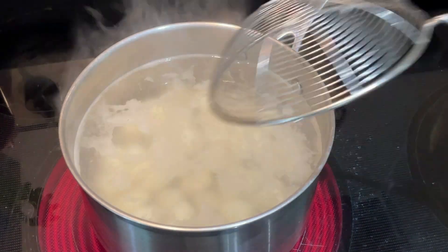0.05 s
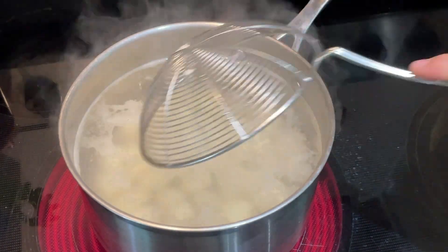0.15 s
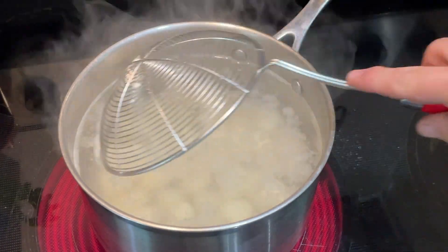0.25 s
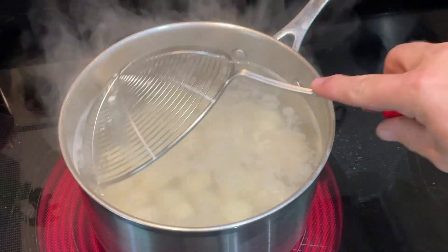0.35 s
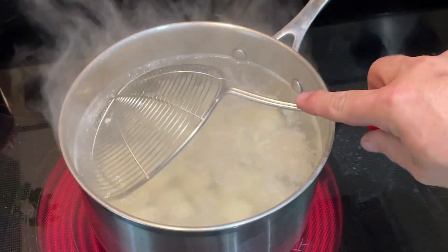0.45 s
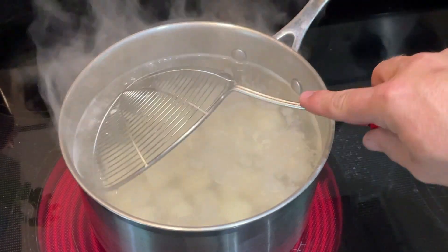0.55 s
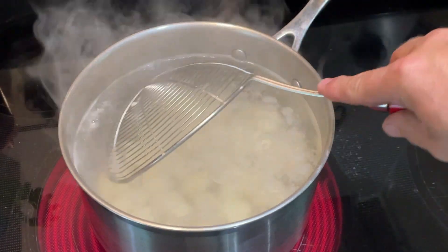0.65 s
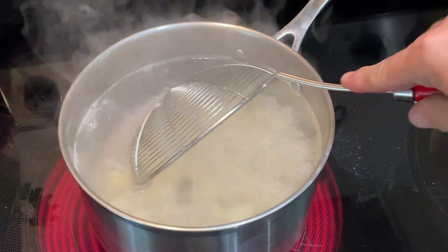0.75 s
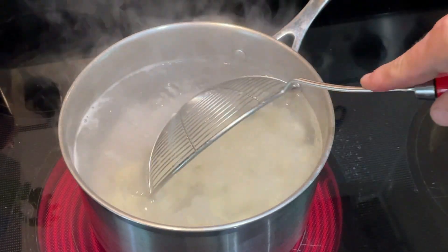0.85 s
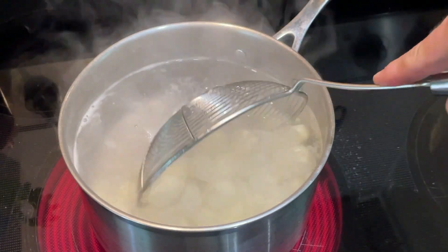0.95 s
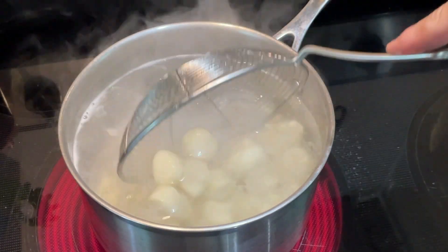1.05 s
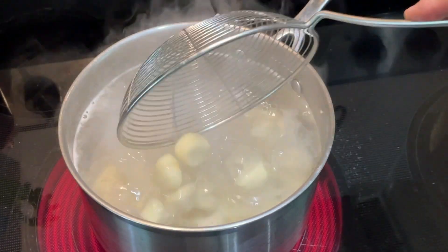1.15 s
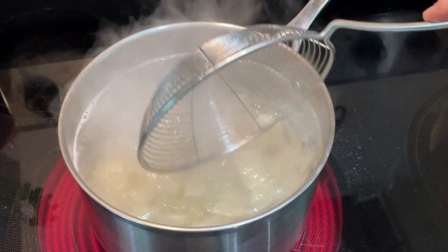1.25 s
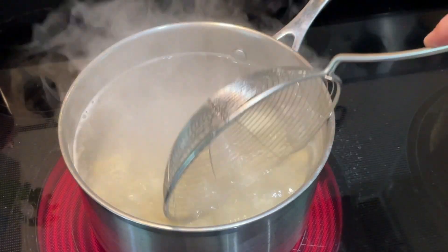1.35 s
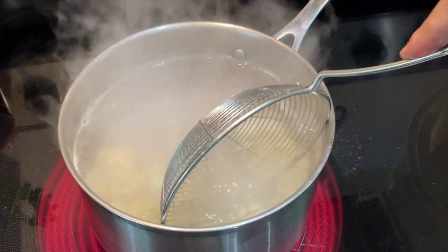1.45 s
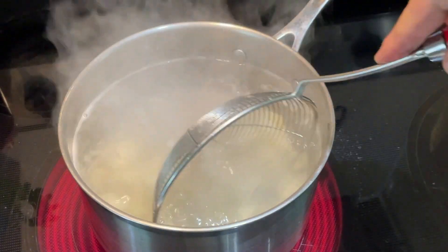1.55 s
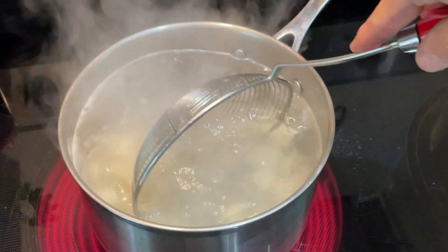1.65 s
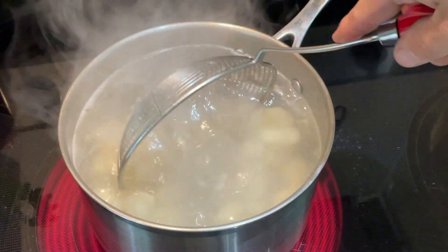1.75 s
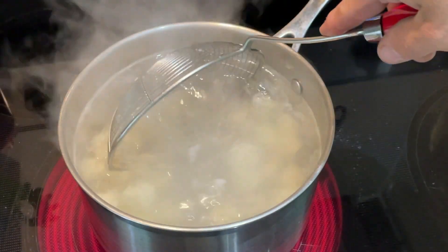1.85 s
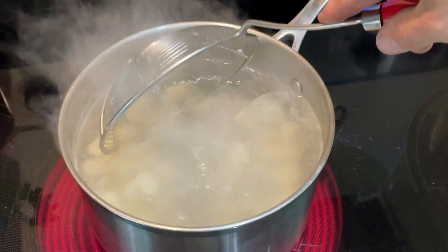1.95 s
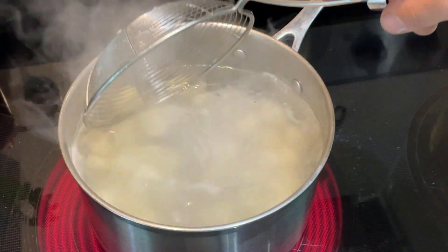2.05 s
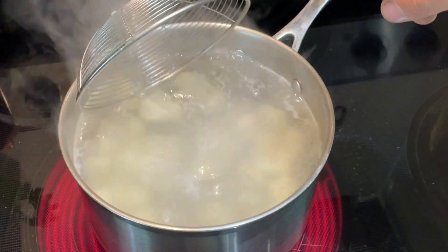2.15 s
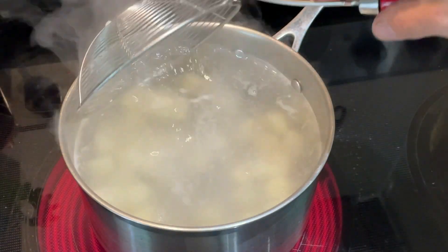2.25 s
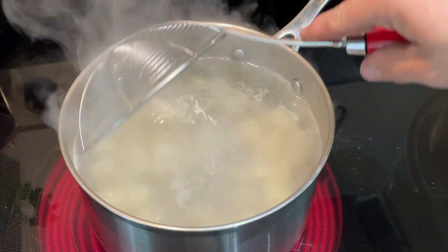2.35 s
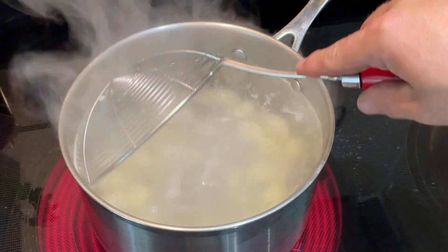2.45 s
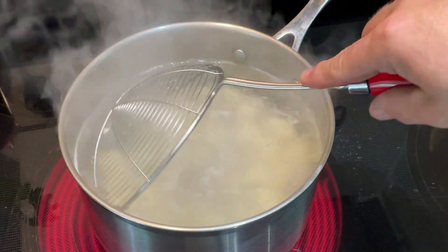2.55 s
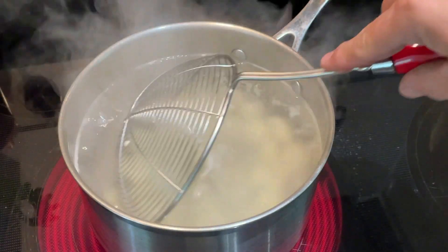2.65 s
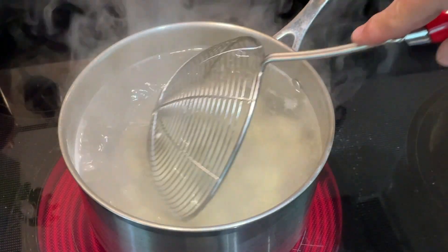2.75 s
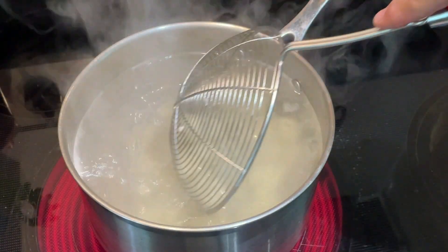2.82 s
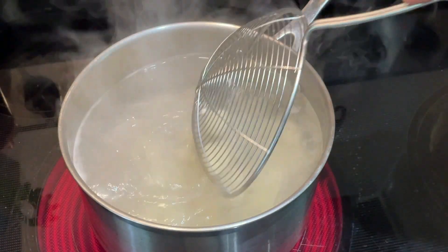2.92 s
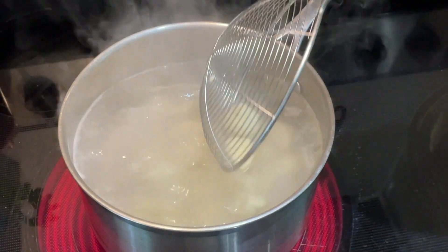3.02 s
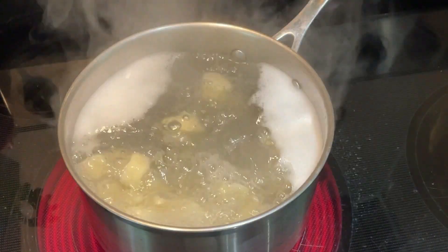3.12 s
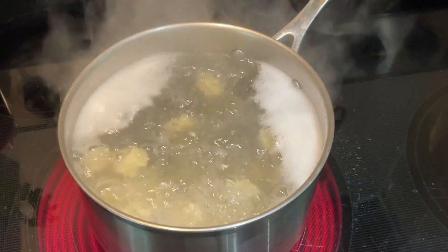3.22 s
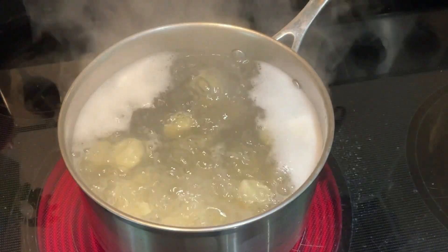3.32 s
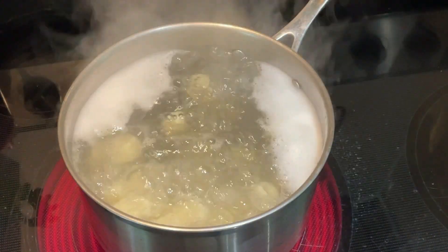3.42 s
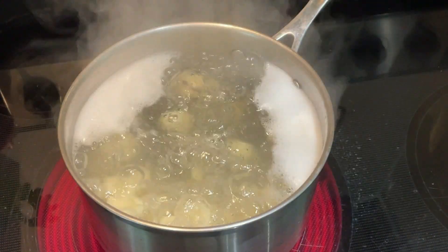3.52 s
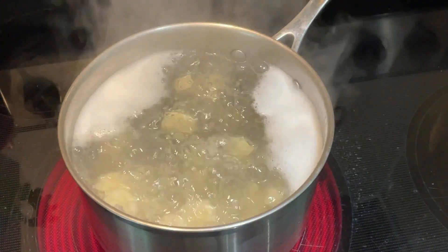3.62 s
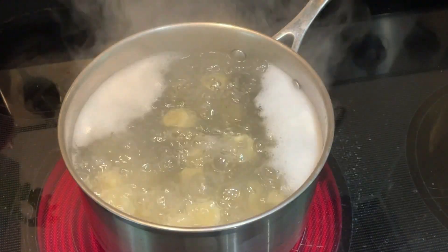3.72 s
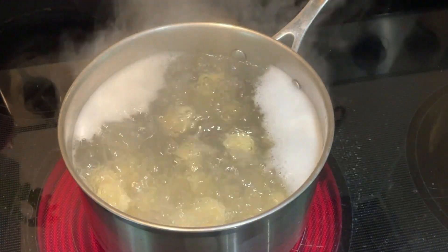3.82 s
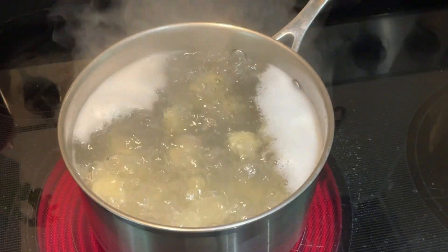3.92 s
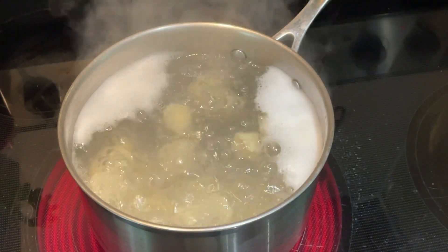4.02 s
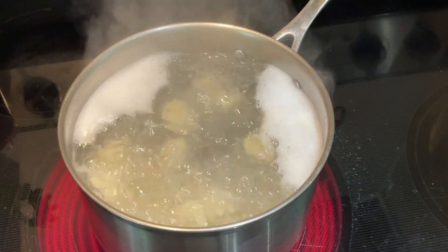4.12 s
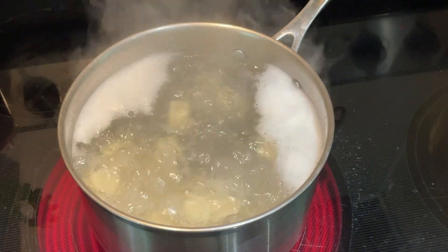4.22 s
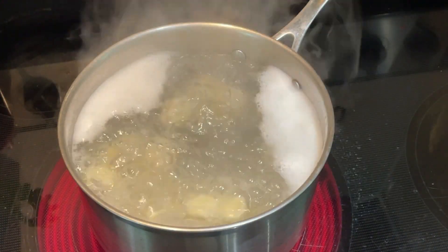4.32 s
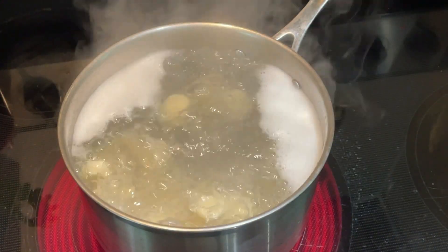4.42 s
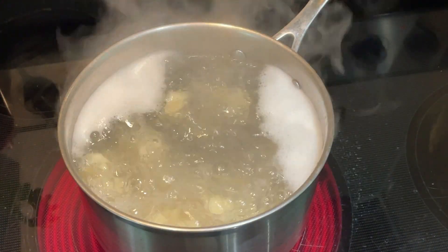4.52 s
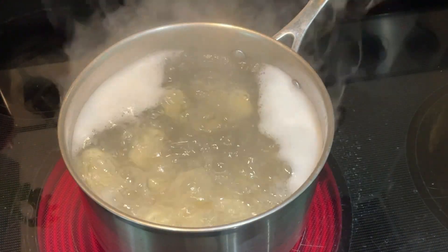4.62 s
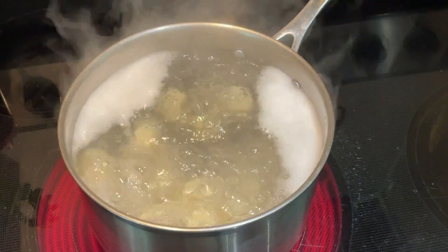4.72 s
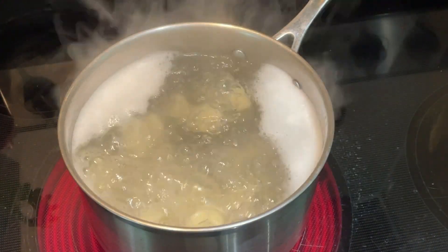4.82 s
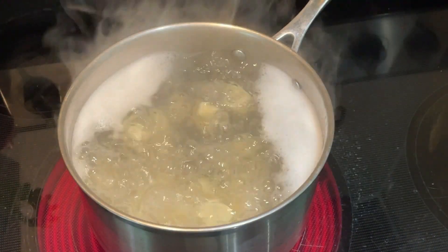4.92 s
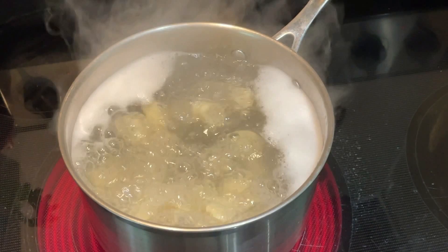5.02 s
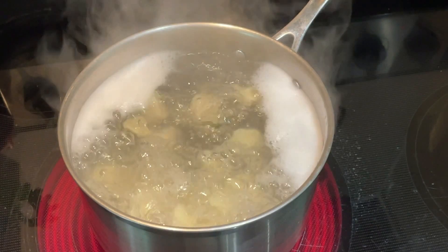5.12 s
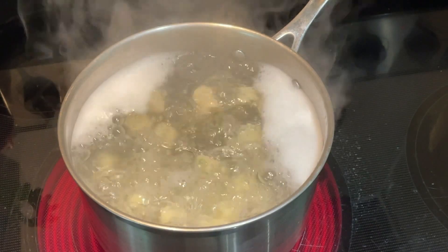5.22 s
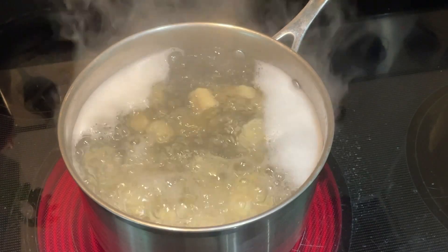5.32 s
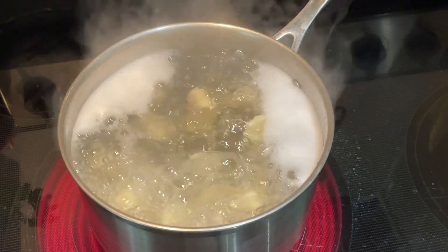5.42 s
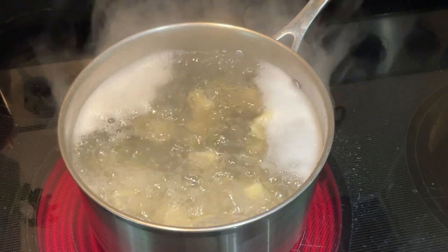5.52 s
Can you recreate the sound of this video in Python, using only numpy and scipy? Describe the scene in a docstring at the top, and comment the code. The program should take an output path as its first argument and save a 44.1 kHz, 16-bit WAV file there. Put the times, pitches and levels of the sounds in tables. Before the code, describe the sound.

Water boils in a metal pan, a wire strainer clanks sharply a few times, then a sudden cut to livelier popping, gurgling bubbles.

```python
"""Dumplings boil hard in a steel saucepan on a glass hob in a home kitchen.
The pan rumbles, the water gurgles and froth hisses: drifting noise, and small bubbles that ring briefly.
A wire skimmer knocks and scrapes: blows and grit set the pan, wires, hob and counter ringing.
A drip and bursting bubbles sound as short rising notes.
The scene cuts at 3.13 s to a more hissing, bubbling boil."""
import sys
import numpy as np
from scipy import signal
from scipy.fft import rfft, irfft, next_fast_len
from scipy.io import wavfile

SR = 44100
rng = np.random.default_rng(int(sys.argv[2]) if len(sys.argv) > 2 else 0)


def pcm_store(signal):
    """Save signal as 16-bit PCM."""
    levels = np.round(np.clip(np.atleast_2d(signal), -1, 1) * 32767)
    wavfile.write(sys.argv[1], SR, levels.astype(np.int16).T)


N = 245892   # length in samples

# vigour of the boil, before and after the cut: t/s, gurgle level/dB, hiss level/dB
BOIL_VIGOUR = [(0, -39, -55), (.15, -46.5, -47), (1.0, -46, -48), (2.3, -44.5, -53), (2.65, -40.5, -49.5),
               (3.1, -48.5, -54), (3.13, -47.5, -44.5), (3.5, -42.5, -47.5), (5.58, -47, -47)]
# bubbles bursting, and first a drip: t/s, level/dB, basic f/Hz
BUBBLES_AND_DRIP = [(1.291, -38, 1550), (3.395, -35.5, 930), (3.463, -22.5, 517), (3.631, -26.5, 495),
                    (3.813, -22.5, 442), (3.964, -33, 577), (4.236, -25, 510), (4.282, -30.5, 650),
                    (4.321, -30, 603), (4.3299, -32.5, 1430), (4.345, -25.5, 425), (4.4783, -40.5, 1540),
                    (4.702, -30, 510), (4.768, -28, 560), (4.898, -25, 527), (4.907, -40, 1530),
                    (4.957, -27, 620), (4.9763, -33, 1360), (5.078, -23, 440), (5.24, -29, 420),
                    (5.2528, -33.5, 1460), (5.372, -41, 634), (5.524, -25, 600)]
# skimmer knocks: t/s, crack level/dB, thump level/dB, pan ring level/dB, favoured pan f/Hz,
# wire ring level/dB, favoured wire f/Hz
SKIMMER_KNOCKS = [(0.343, -38.5, -39, -55, 800, -55, 5000), (0.3911, -12, -11.5, -15, 1180, -17, 3080),
                  (.522, -10.5, -15, -15.5, 610, -34, 3300), (0.6472, -28.5, -21, -21.5, 800, -25, 3470),
                  (1.4474, -13.5, -35, -21, 990, -11, 3400), (1.4678, -5.5, -10, -16.5, 900, -21, 5430),
                  (1.4841, -41, -14.5, -29, 1410, -15.5, 2610), (1.5175, -20, -24.5, -19, 920, -22, 6600),
                  (2.357, -31, -26, -34, 695, -35, 3370), (2.4157, -37, -26.5, -40, 790, -28.5, 2750),
                  (2.626, -65, -30, -33.5, 780, -40, 1990)]
# skimmer dragged along the wall: start t/s, length t/s, pan rub level/dB, wire rub level/dB
SKIMMER_DRAGS = [(0.617, 0.14, -61, -58), (0.777, 0.099, -72, -52.5), (2.354, 0.1, -72, -71),
                 (2.624, .14, -71, -85)]
# ways the glass hob rings: f/Hz, relative level/dB, time to fall 60 dB t/s
HOB_MODES = [(163.9, 2, 0.35), (181.7, -10, 0.22), (221.4, -3, 0.051), (247, -14, 0.33), (320.8, 2, 0.2)]
# ways the counter rings: f/Hz, relative level/dB, time to fall 60 dB t/s
COUNTER_MODES = [(60.85, -2, 0.49), (83, 8.5, 0.22), (111, 3, 0.6)]
# ways the pan rings, each the middle of a close pair: f/Hz, relative level/dB, time to fall 60 dB t/s
PAN_MODES = [(425, -1.5, 0.11), (512, -3.5, 0.038), (588, -0.5, 0.11), (821, -5, 0.082),
             (1008, -2.5, 0.042), (1158, -11.5, 0.083), (1452, -10.5, 0.091), (1474, -3.5, 0.086)]
# ways the wire basket rings, each the middle of a close pair: f/Hz, relative level/dB
WIRE_MODES = [(1700, -6.5), (2020, -6.5), (2480, -11), (2660, -10.5), (2860, -4.5), (3380, -4.5),
              (3600, -16), (3950, -7.5), (4460, -5.5), (5300, -4.5), (6400, -4)]
# colour of the pan's rumble: f/Hz, relative level/dB
RUMBLE_COLOUR = [(25, -31), (40, -20.5), (58, 6), (75, -3.5), (95, -12), (120, -4), (160, -11.5),
                 (220, -18), (400, -24.5)]
# colour of the gurgling water: f/Hz, relative level/dB
GURGLE_COLOUR = [(150, -13), (250, 5.5), (310, 11), (400, -6.5), (600, -6), (800, -14.5), (1200, -19.5),
                 (2000, -21)]
# colour of the froth: f/Hz, relative level/dB
HISS_COLOUR = [(300, 10.5), (800, 10), (1500, 3.5), (2500, 2), (4000, -1.5), (6000, -3.5), (8000, -7),
               (11000, -13.5), (13500, -16), (14200, -26)]
# colour of a knock's crack: f/Hz, relative level/dB
CRACK_COLOUR = [(200, -3), (800, 4), (1800, -5.5), (3000, -1), (5500, -3.5), (8000, -0.5), (11000, -8.5),
                (13500, -15.5), (16000, -5.5)]
# how alike noise is left and right: f/Hz, likeness (1 = the same)
STEREO_LIKENESS = [(60, 0.99), (130, 1), (290, 0.82), (640, 0.47), (1410, 0.37), (2400, 0.95), (3100, 1),
                   (6800, 1), (15000, 1)]
# how far the left microphone port leads the right: f/Hz, phase/radians
PORT_LEAD = [(100, 0), (950, .3), (2700, 0), (6000, 0), (7200, -1.2), (8300, -np.pi), (11100, -6.2),
             (12300, -6.5), (13600, -8.4), (14000, -9.4)]
# colour of the kitchen's reflections: f/Hz, relative level/dB
KITCHEN_COLOUR = [(100, 2.5), (1000, 9.5), (13000, 3.0), (14500, 0)]

CUT_AT_S = 3.13
RUMBLE_BEFORE_CUT_DB = -35.5
RUMBLE_DB, RUMBLE_DB_PER_S = -36, 1.5   # after the cut: start level, then steady growth
BUBBLES_DB, LUMPIER = -45.5, 1.4   # small bubbles at a gurgle of -42 dB; dB gained per dB of gurgle
TWIN_PITCH, TWIN_DB, TWIN_EARLY_S = 2.02, -11, 0.00201   # a smaller, higher note just ahead of each
# lesser bursts come at random after the cut; the level is that of the faintest
MIDDLING_PER_S, MIDDLING_DB, MIDDLING_HZ = 40, -41, (357, 800)
BITE_S, LIFT_DB_PER_S, PRESS_DB = 0.017, 500, 1.5   # contact builds, lets go, presses hardest midway
PAN_RUB_HZ, WIRE_RUB_HZ = 840, 2640   # pitches that a drag favours
SPOT_DB_PER_OCTAVE = 11   # how fast modes fall away from the favoured pitch
SPLIT = 0.035   # every pan and wire mode is a close pair, this share of its pitch apart
WIRE_T60_S = .04   # water and hand damp the wires quickly
COUNTER_DB = 3   # counter relative to hob
KITCHEN_T60_S, KITCHEN_DB = 0.35, -36.5
CUTOFF_HZ = 15900
LEFT_RIGHT = np.array([[1], [-1]])   # opposite signs for the two channels


def amp(db):
    """Turn dB into a multiplier."""
    return 10 ** (np.asarray(db) / 20)


def rms_one(x):
    """Scale a sound to an average strength (rms) of 1."""
    return x / np.sqrt(np.mean(x ** 2) + 1e-20)


def in_time(rows):
    """Join a table's points by straight lines: one value per sample for each column."""
    s, *columns = np.transpose(rows)
    return [np.interp(np.arange(N) / SR, s, c) for c in columns]


def at_hz(points, hz):
    """Read a table between its points, with octaves evenly spaced."""
    table_hz, values = np.array(points).T
    return np.interp(np.log(np.maximum(hz, 1)), np.log(table_hz), values)


def drift(rate):
    """Slow random wandering of spread 1, made by smoothing noise; a higher rate wanders faster."""
    step = 40   # compute every 40th sample, then fill in
    r = np.exp(-2 * np.pi * step * rate / SR)
    noise = rng.standard_normal(N // step + 2002)
    slow = signal.lfilter([1], [1, -2 * r, r * r], noise)[2000:]   # drop the filter's start-up
    return np.interp(np.arange(N) / step, np.arange(len(slow)), rms_one(slow))


def ring(clicks, hz, t60):
    """Each unit click sets off a dying sine of height 1 that falls 60 dB in t60 seconds."""
    r = amp(-60 / (t60 * SR))
    w = 2 * np.pi * hz / SR
    return signal.lfilter([0, np.sin(w)], [1, -2 * r * np.cos(w), r * r], clicks + 1e-18)


def stereo_noise(spectrum, size):
    """Noise of a given colour and rms 1, as alike left and right as the microphones hear it."""
    hz = np.fft.rfftfreq(size, 1 / SR)
    mid, side = rfft(rng.standard_normal((2, size)))
    alike = np.clip(at_hz(STEREO_LIKENESS, hz), 0, 1)
    pair = np.sqrt(1 + alike) * mid + np.sqrt(1 - alike) * side * LEFT_RIGHT
    return rms_one(irfft(pair * amp(at_hz(spectrum, hz)), size))


def patchy(spectrum, shared_db, own_db, rate):
    """Stereo noise of rms 1 whose octave bands swell partly together, partly alone."""
    size = next_fast_len(N)
    whole = rfft(stereo_noise(spectrum, size=size))
    octave = np.log2(np.fft.rfftfreq(size, 1 / SR) + 1)
    out, together = 0, drift(rate)
    lowest, highest = np.log2(np.array(spectrum)[[0, -1], 0])
    for centre in np.arange(np.floor(lowest), np.ceil(highest) + 1):
        share = np.clip(1 - abs(octave - centre), 0, 1)   # neighbouring bands cross-fade
        band = irfft(whole * share, size)[:, :N]
        out = out + band * amp(shared_db * together + own_db * drift(rate))
    return rms_one(out)


def pan_rumble():
    """The pan rumbles on the hob as deep noise, and more and more after the cut."""
    after_cut_s = np.arange(N) / SR - CUT_AT_S
    growing_db = RUMBLE_DB + RUMBLE_DB_PER_S * after_cut_s
    level_db = np.where(after_cut_s < 0, RUMBLE_BEFORE_CUT_DB, growing_db)
    return amp(level_db) * patchy(RUMBLE_COLOUR, shared_db=-0.7, own_db=-0.1, rate=6.0)


def churning_water(gurgle_db):
    """Churning water is noise whose bands swell mostly alone."""
    return amp(gurgle_db) * patchy(GURGLE_COLOUR, shared_db=-1.0, own_db=4.0, rate=6.7)


def small_bubbles(per_s, spread_db, cycles):
    """Random collapses in clumps, each ringing a few cycles somewhere across the pan."""
    sizes = amp(spread_db * np.minimum(rng.exponential(1, N), 3)) * rng.choice([-1, 1], N)
    born = rng.random(N) < per_s * amp(5 * drift(8)) / SR   # the drift makes the clumps
    pitches = np.geomspace(180, 1900, 24)   # Hz
    dealt, out = rng.integers(0, len(pitches), N), 0
    for k, hz in enumerate(pitches):
        rung = ring(sizes * born * (dealt == k), hz, cycles / hz)
        one = rung * amp(at_hz(GURGLE_COLOUR, hz)) * hz
        out = out + one * amp(rng.normal(0, 1.6) * LEFT_RIGHT)
    return rms_one(out)


def froth_hiss(hiss_db):
    """Froth is bright noise that flutters quickly."""
    return amp(hiss_db) * patchy(HISS_COLOUR, shared_db=.6, own_db=1.2, rate=20.0)


def paired(modes):
    """Each mode becomes two close ones that share its power, for denser ringing."""
    return [(hz * (1 + side * SPLIT), db - 3, t60) for hz, db, t60 in modes for side in (-.5, .5)]


def struck(modes, blows_db, favoured_hz, rub, rub_hz, soft_s, rattle_s):
    """Knocks and dense grit set a body ringing; the spot touched favours modes near one pitch."""
    at, out = [round(row[0] * SR) for row in SKIMMER_KNOCKS], 0
    contact = np.hanning(max(round(soft_s * SR), 1) + 2)[1:-1]   # a soft contact lasts longer
    fade = np.exp(-1 / (rattle_s * SR + 1e-9))
    scatter_db = 2.2 * rng.standard_normal((len(at), len(modes)))
    for k, (hz, level_db, t60) in enumerate(modes):
        blows = np.zeros(N)
        away_db = SPOT_DB_PER_OCTAVE * abs(np.log2(hz / favoured_hz))
        blows[at] = amp(blows_db - away_db + scatter_db[:, k])
        # many small touches follow a blow
        rattle = signal.lfilter([0, np.sqrt(1 - fade ** 2) * fade], [1, -fade], blows)
        rubbed = rub * amp(-SPOT_DB_PER_OCTAVE * abs(np.log2(hz / rub_hz)))
        grit = (rattle + rubbed) * rng.standard_normal(N)
        force = (-1) ** k * (1 - fade) * blows + grit
        out = out + amp(level_db) * ring(force, hz, t60)
    return signal.lfilter(contact / contact.sum(), 1, out)


def drags():
    """Rubbing force on pan and wires: it bites, swells midway and lifts off."""
    t, out = np.arange(N) / SR, 0
    for start, length, *rub_db in SKIMMER_DRAGS:
        age = t - start
        press_db = PRESS_DB * np.sin(np.pi * np.clip(age / length, 0, 1))
        lift_db = LIFT_DB_PER_S * np.maximum(age - length, 0)
        bite = np.clip(age / BITE_S, 0, 1)
        out = out + bite * amp(press_db - lift_db + np.array(rub_db)[:, None])
    return out


def skimmer():
    """Crack of contact, thump of counter and hob, ring of pan and wire, and the grit of the drag."""
    _, crack_db, thump_db, pan_db, pan_hz, wire_db, wire_hz = np.transpose(SKIMMER_KNOCKS)
    pan_rub, wire_rub = drags() * amp(3.2 * drift(32))   # the wires catch unevenly
    hits = np.zeros(N)
    hits[[round(row[0] * SR) for row in SKIMMER_KNOCKS]] = amp(crack_db)
    snap = signal.lfilter([1], [1, -np.exp(-1 / (0.0026 * SR))], hits)
    chatter = signal.lfilter([1], [1, -np.exp(-1 / (0.02 * SR))], hits)   # loose wires rattle on
    noise = stereo_noise(CRACK_COLOUR, size=next_fast_len(N))[:, :N]
    crack = noise * (snap + amp(-9.0) * chatter)
    thin = signal.butter(2, 6500, "high", fs=SR, output="sos")   # a light drag has no body
    rasp = amp(16.5) * wire_rub * signal.sosfilt(thin, noise)
    deep = struck(COUNTER_MODES, thump_db + COUNTER_DB, 95, 0, 92, soft_s=0.016, rattle_s=0)
    thump = struck(HOB_MODES, thump_db, 197, amp(-7) * pan_rub, 176, soft_s=0.0039, rattle_s=0)
    pan = struck(paired(PAN_MODES), pan_db, pan_hz, pan_rub, PAN_RUB_HZ,
                 soft_s=0.0004, rattle_s=0.011)
    wires = paired([(hz, db, WIRE_T60_S) for hz, db in WIRE_MODES])
    wire = struck(wires, wire_db, wire_hz, wire_rub, WIRE_RUB_HZ, soft_s=0, rattle_s=0.018)
    return crack + rasp + deep + thump + pan + wire


def kitchen(x):
    """Dense reflections, a burst of coloured noise, build up very quickly and die away."""
    size = 32768
    t = np.arange(size) / SR
    tail = stereo_noise(KITCHEN_COLOUR, size=size)
    build_up = 1 - np.exp(-t / 0.00043)
    tail = tail * build_up * amp(-60 * t / KITCHEN_T60_S + KITCHEN_DB)
    return signal.fftconvolve(x[None], tail, axes=1)[:, :N]


def lesser_bursts():
    """Middling bubbles burst at random moments, levels and pitches after the cut."""
    when, size_db, pitch = rng.random((200, 3)).T
    times = CUT_AT_S - np.cumsum(np.log(1 - when)) / MIDDLING_PER_S   # random gaps
    low, high = MIDDLING_HZ
    rows = zip(times, MIDDLING_DB + 9 * size_db ** 2, low * (high / low) ** pitch)
    return [row for row in rows if row[0] < N / SR]


def drip_and_bursts():
    """The drip and each bubble swell, ring a few cycles and rise in pitch, as a bubble opening does."""
    size = 2048
    out, t = np.zeros((2, N + size)), np.arange(size) / SR
    twins = [(s - TWIN_EARLY_S, db + TWIN_DB, hz * TWIN_PITCH) for s, db, hz in BUBBLES_AND_DRIP]
    for s, level_db, hz in BUBBLES_AND_DRIP + twins + lesser_bursts():
        age = t / (.3 / hz + .001)   # time in units of the swell
        swell = age * np.exp(1 - age)
        bubble = swell * np.sin(2 * np.pi * hz * t * (0.628 + 0.12 * age))
        pan_db = rng.normal(.5, 1) * LEFT_RIGHT   # placed at random, a little left on average
        at = round(s * SR)
        out[:, at:at + size] += amp(level_db + pan_db) * bubble
    return out[:, :N]


def scene():
    """Boil, bubbles and skimmer in the kitchen; skimmer, drip and bursts also reflect off the room."""
    gurgle_db, hiss_db = in_time(BOIL_VIGOUR)
    rumble = pan_rumble()
    churn = churning_water(gurgle_db)
    bubbles_db = BUBBLES_DB + LUMPIER * (gurgle_db + 42)
    gurgle = amp(bubbles_db) * small_bubbles(per_s=350, spread_db=3.6, cycles=5.5)
    hiss = froth_hiss(hiss_db)
    tool, pops = skimmer(), drip_and_bursts()
    placed_tool = tool * amp(.6 * LEFT_RIGHT)   # the skimmer works a little to the left
    room = kitchen((tool + pops).mean(axis=0))
    return rumble + churn + gurgle + hiss + pops + placed_tool + room


def record(dry):
    """Two microphone ports turn treble phase apart; deep bass is lost, peaks rounded, the top cut."""
    size = next_fast_len(N + 2048)
    lead = at_hz(PORT_LEAD, np.fft.rfftfreq(size, 1 / SR))
    turned = irfft(rfft(dry, size) * np.exp(.5j * lead * LEFT_RIGHT), size)[:, :N]
    no_infra = signal.sosfilt(signal.butter(2, 40, "high", fs=SR, output="sos"), turned)
    rounded = 1.152 * np.tanh(no_infra / 1.025)
    top_cut = signal.ellip(10, .5, 70, CUTOFF_HZ, fs=SR, output="sos")
    return signal.sosfilt(top_cut, rounded)


dry = scene()
out = record(dry)
pcm_store(out)
```